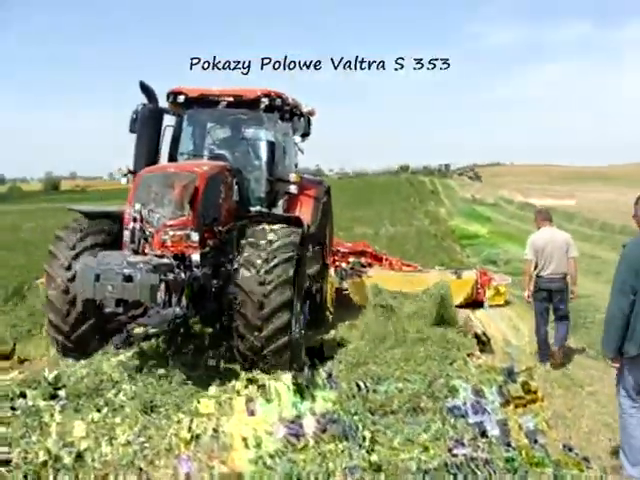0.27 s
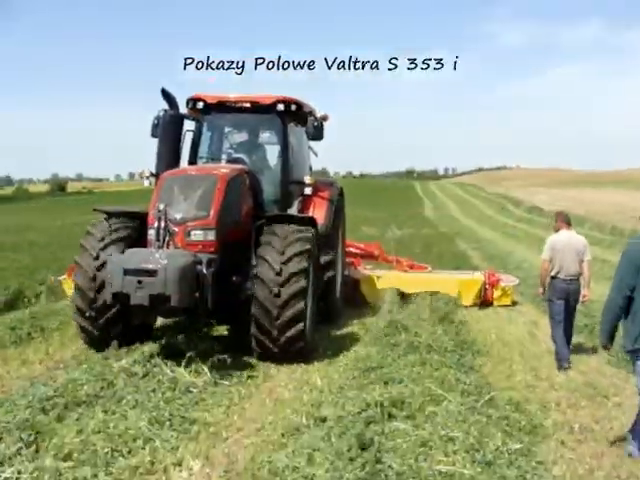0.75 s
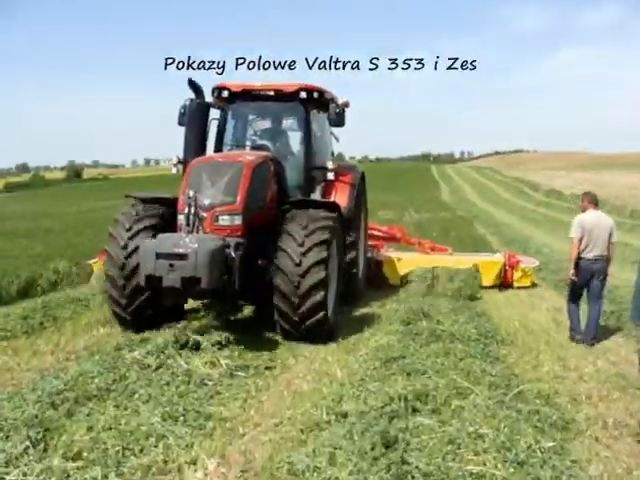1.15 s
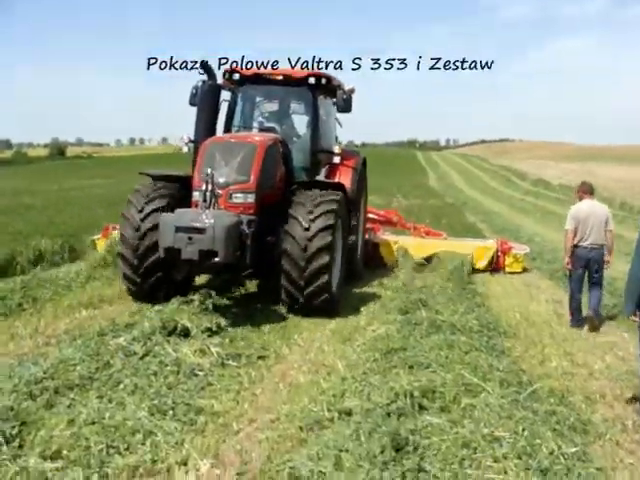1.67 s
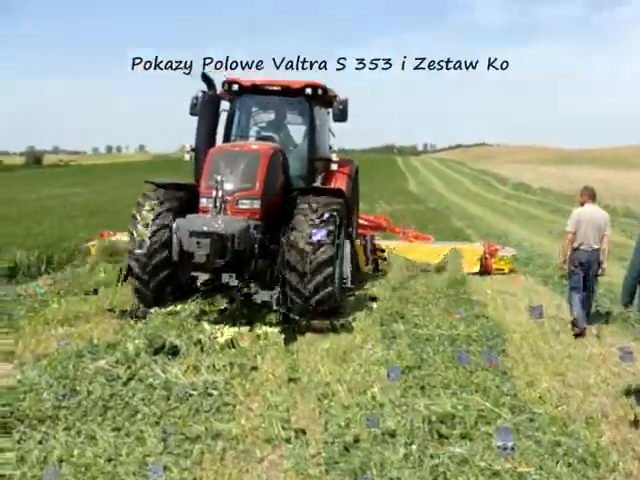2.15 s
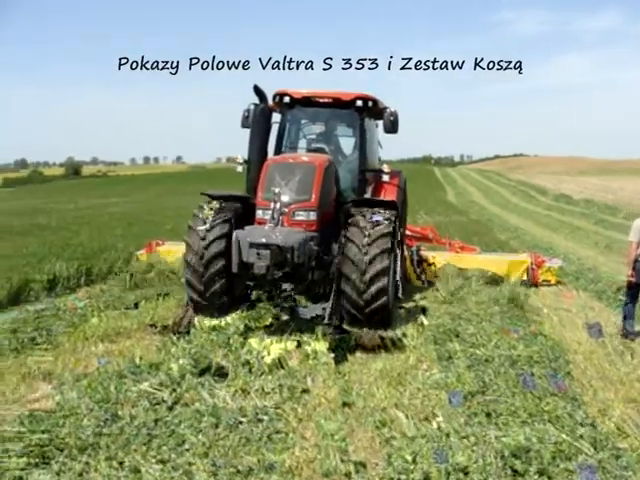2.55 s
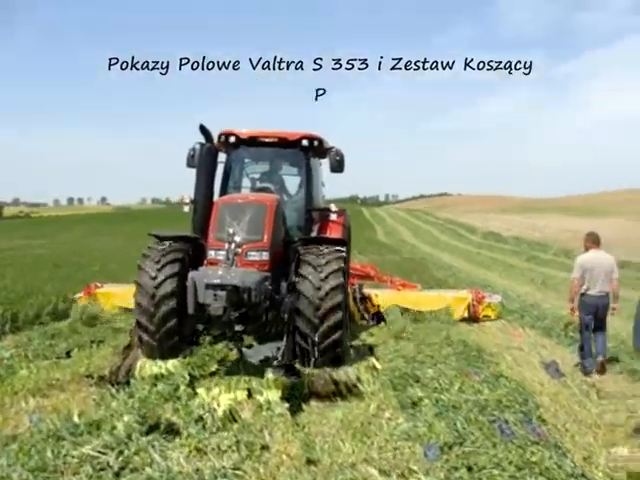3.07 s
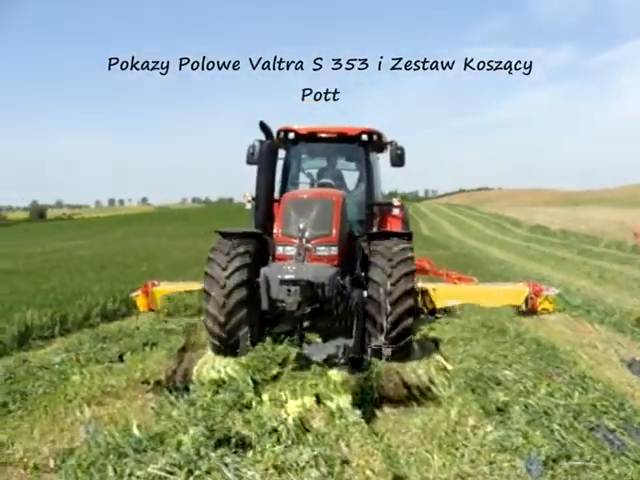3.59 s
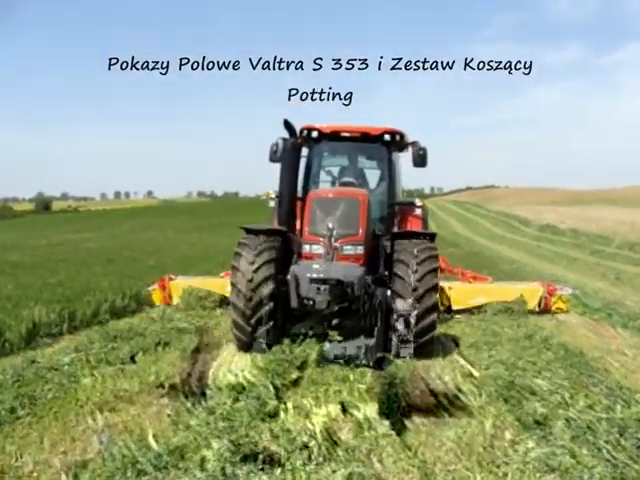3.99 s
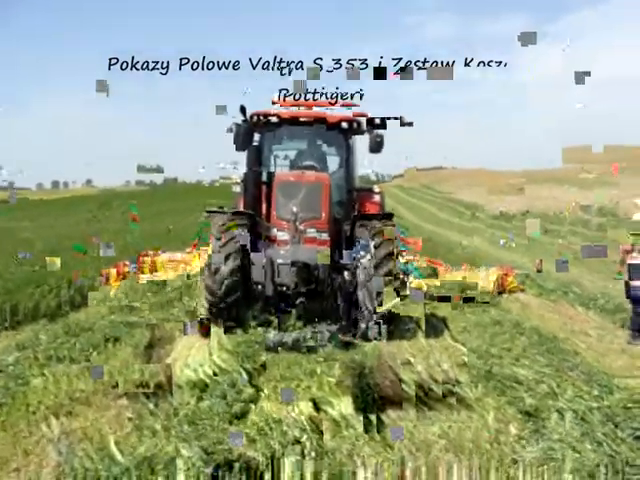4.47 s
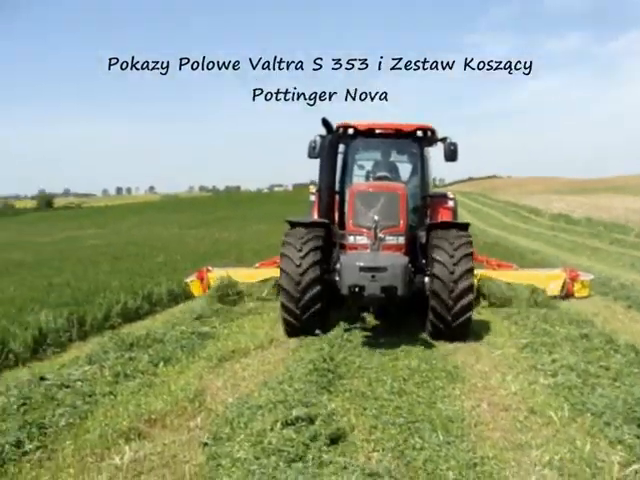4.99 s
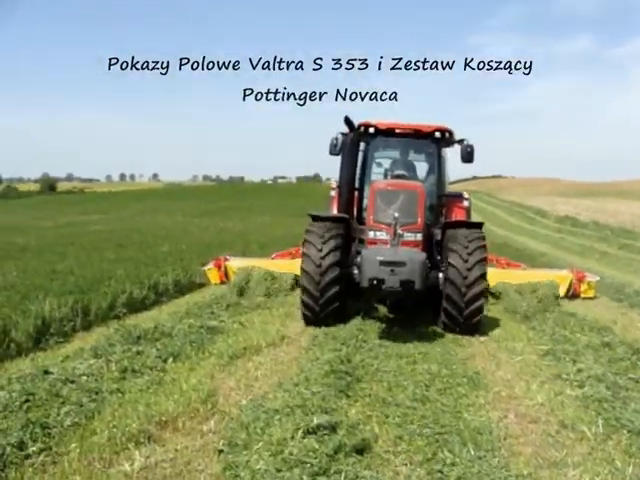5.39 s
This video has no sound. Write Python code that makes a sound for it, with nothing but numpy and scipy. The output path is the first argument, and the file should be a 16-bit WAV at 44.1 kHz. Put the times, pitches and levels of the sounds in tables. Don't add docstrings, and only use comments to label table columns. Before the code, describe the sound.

A large tractor engine drones steadily at high idle outdoors, with a thin wavering turbo whistle and broad hiss from a spinning mower.

```python
import sys
import numpy as np
from scipy import signal
from scipy.io import wavfile
from scipy.ndimage import uniform_filter1d

SR = 44100
rng = np.random.default_rng(int(sys.argv[2]) if len(sys.argv) > 2 else 0)


def digitize_waveform(pressure):
    field = np.atleast_2d(pressure).T
    bounded = np.clip(field, -1, 1)
    quanta = np.round(bounded * 32767).astype(np.int16)
    wavfile.write(sys.argv[1], SR, quanta)


def rack_gain(trim_db):
    fader = np.asarray(trim_db, float)
    return 10 ** (fader / 20)


N = 248283
T = np.arange(N) / SR
AWAY = np.linspace(-.5, .5, N)
START_S = .311

# (time [s], firing rate [Hz])
FIRING_RATE = [(.31, 115.5), (.65, 115.75), (1.2, 114.4), (1.55, 114.1), (2.1, 116.3), (2.35, 116.3),
               (2.75, 114.7), (2.95, 114.65), (3.2, 114.87), (5.3, 114.82), (5.63, 115.1)]


def evened(x):
    return x / np.sqrt(np.mean(abs(x) ** 2) + 1e-20)


def curve(rows):
    s, value = np.transpose(rows)
    return np.interp(T, s, value)


def smooth(rows):
    return uniform_filter1d(curve(rows), size=6000)


def swells(rows, axis=2):
    t = T[::64]
    total = 0
    for row in rows:
        phase = np.clip((t - row[0]) / row[1], -.5, .5)
        total = total + row[axis] * np.cos(np.pi * phase) ** 2
    return np.interp(T, t, total)


def drift(width_hz):
    r = np.exp(-np.pi * width_hz * 8 / SR)
    z = [1, 1j] @ rng.standard_normal((2, (N + SR) // 8 + 1))
    z = signal.lfilter([1], np.convolve([1, -r], [1, -r]), z)
    return evened(np.interp(T + 1, np.arange(len(z)) * 8 / SR, z))


def tone(hz, db, rough, width_hz):
    cycles = np.cumsum(hz * np.ones(N)) / SR + rng.random()
    carrier = np.exp(2j * np.pi * cycles)
    rough = np.clip(rough, 0, 1)
    waver = np.sqrt(1 - rough ** 2) + rough * drift(width_hz)
    return np.sqrt(2) * rack_gain(db) * (carrier * waver).real


def faint(lines, unit_hz):
    far = np.clip(2.5 * AWAY + .5, 0, 1)
    return sum(tone(k * unit_hz, 1.5 + near_db + (far_db - near_db) * far, rough=.35, width_hz=4)
               for k, near_db, far_db in lines)


def facing(pairs, changes):
    # (time [s], turn [0 = side on, 1 = head on])
    nose = [
        (.31, 0),
        (2.1, 0.02),
        (2.83, .17),
        (2.845, .93),
        (3.2, 1),
        (5.63, 1),
    ]
    turn = curve(nose)
    return [side_db + (head_db - side_db) * turn + swells(rows)
            for (side_db, head_db), rows in zip(pairs, changes)]


def read(points, hz):
    f, db = np.transpose(points)
    return np.interp(np.log(hz + 1), np.log(f), db)


def band(lo_hz, hi_hz, count):
    sos = signal.butter(8, [lo_hz, hi_hz], "bandpass", fs=SR, output="sos")
    return evened(signal.sosfilt(sos, rng.standard_normal(count + 500))[500:])


def exhaust():
    # (side on [dB], head on [dB])
    orders = [(-33.5, -30.5), (-40, -39.5), (-31, -27.5), (-44.5, -27.5), (-19.5, -30), (-38, -43)]
    # (middle [s], length [s], change [dB])
    echo = [
        [(1.3, 0.97, 4.5), (1.82, 0.79, -9), (4.15, 0.24, -7)],
        [(1.87, .4, -9), (2.9, 3, 5), (3.85, 0.44, 5.5)],
        [(1.15, 1, -3.5), (2.22, 0.45, 4), (2.9, 0.49, -2), (4.6, 0.47, -4), (5.6, 0.91, -14)],
        [(1.35, .6, 12), (2.05, 0.54, 13), (3.62, 0.19, -4), (4.2, 0.23, -4), (2.65, .3, 10), (2.95, 0.31, -10)],
        [(.85, 0.29, -4), (2.18, 0.27, -4), (2.7, 0.23, -5), (4, 0.43, 4), (3.6, .2, -13), (4.45, 0.3, 6.5),
         (4.93, 0.24, -15), (5.5, 0.69, -9)],
        [(2.2, .5, 7.5), (2.6, 0.59, 10), (3.5, .3, 10)],
    ]
    # (multiple of crank speed [-], near [dB], far [dB])
    crank = [(20, -52, -45), (24, -49, -45), (26, -50, -45), (27, -47, -46), (30, -40, -48), (32, -42, -45),
             (33, -45, -46), (36, -47, -52), (42, -40, -39), (52, -43, -40)]
    # (multiple of crank speed [-], resting level [dB])
    mesh_lines = [(28, -60), (30, -60), (42, -60), (52, -60)]
    # (middle [s], length [s], change [dB])
    mesh_swells = [
        (1.7, 1.2, 24),
        (1.25, 1.2, 24),
        (2.7, 2, 26),
        (3, 2.2, 26),
    ]
    hz = smooth(FIRING_RATE)
    strong = sum(tone(k * hz, db, rough=.15, width_hz=18)
                 for k, db in enumerate(facing(orders, echo), 2))
    mesh = sum(tone(k * hz / 3, db + swells([bump]), rough=.4, width_hz=8)
               for (k, db), bump in zip(mesh_lines, mesh_swells))
    return strong + faint(crank, hz / 3) + mesh


def shafts():
    # (side on [dB], head on [dB])
    hums = [
        (-47.5, -43),
        (-40, -40.5),
        (-39.5, -37),
    ]
    # (middle [s], length [s], change [dB])
    beats = [
        [(.8, .4, 5.5), (2.95, .5, -9)],
        [(.85, .35, -12), (1.72, .25, -9), (3.72, 0.18, -12), (4.12, .2, -9), (4.65, .8, -13)],
        [(.65, 0.83, 4), (1.85, .7, -11), (3, .3, -10)],
    ]
    # (multiple of disc speed [-], near [dB], far [dB])
    discs = [(1, -56, -58), (3, -53, -54), (8, -52, -46), (10, -43, -48), (12, -48, -43), (14, -50, -45),
             (16, -47, -47), (19, -52, -47), (20, -41, -50)]
    # (frequency [Hz], near [dB], far [dB])
    gears = [(175, -50, -49), (623, -40, -42), (5362, -46, -46)]
    disc_hz, fan_hz = 53.37, 58.6
    speed = smooth(FIRING_RATE)
    speed = speed / speed.mean()
    hum_hz = (2 * disc_hz, 2 * fan_hz, 4 * disc_hz)
    hum = sum(tone(hz * speed, db, rough=.2, width_hz=6)
              for hz, db in zip(hum_hz, facing(hums, beats)))
    return hum + faint(discs, disc_hz * speed) + faint(gears, speed)


def turbo():
    # (time [s], blade tone [Hz])
    blade_tone = [(.31, 9260), (.5, 9260), (.9, 8960), (1.12, 8870), (1.4, 8990), (1.75, 9380), (2.0, 9490),
                  (2.15, 9310), (2.5, 8550), (2.7, 8315), (2.9, 8330), (3.3, 8660), (3.6, 8890),
                  (4.1, 9165), (4.7, 9465), (5.3, 9725), (5.63, 9815)]
    # (middle [s], length [s], change [dB])
    flares = [(.45, 0.68, 7.5), (.99, 0.31, 5.5), (1.28, 0.38, 4.5), (1.77, 0.2, 8.5), (2.05, 0.13, 7),
              (2.17, .12, -6), (2.36, 0.13, 3), (2.47, 0.1, -1), (3.27, .15, 5), (3.5, 0.13, 2),
              (3.71, .12, -6), (3.82, 0.11, 9), (4, 0.21, 7.5), (4.4, .4, -7), (4.72, 0.44, 6),
              (5.32, .2, 2)]
    # (middle [s], length [s], change [Hz], change [dB])
    skirt_lean = [
        (1.1, .8, -300, 2.5),
        (4, .5, 200.5, 0.5),
    ]
    hz = smooth(blade_tone)
    resonance_db = 7.5 * np.exp(-((hz - 8920) / 230) ** 2)
    fading_db = 2.2 * drift(20).real
    db = -41.5 + resonance_db + swells(flares) + fading_db
    whistle = tone(hz, np.maximum(db, -44.5) + .6, rough=.64, width_hz=110)
    duct_db = -5 * np.clip((hz - 8950) / 400, -1.3, 1.3) ** 2
    skirt_db = uniform_filter1d(db, size=4000) - 2.5 + duct_db + swells(skirt_lean, axis=3)
    skirt_hz = hz + 45 + swells(skirt_lean)
    return whistle + tone(skirt_hz, skirt_db, rough=.99, width_hz=460)


def roar():
    # (frequency [Hz], density [dB
    # per Hz])
    roar_spectrum = [(30, -76), (65, -73), (95, -67), (150, -65), (250, -54), (330, -53.5), (420, -59.5),
                     (530, -52), (640, -50), (780, -52.5), (950, -58), (1180, -52.5), (1440, -54.5),
                     (1600, -49), (1980, -50), (2080, -53), (2450, -50.5), (2900, -52), (4050, -53), (4650, -57.5),
            (5300, -55.5), (6400, -59.5), (7250, -66), (8300, -68.5), (9200, -70), (10100, -75.5)]
    # (frequency [Hz], change [dB])
    retreat = [(200, -2.5), (410, 4), (620, -0.5), (950, 0.5), (1170, -3), (1500, -0.3), (2500, 2),
               (4000, 1), (9000, -0.5)]
    # (time [s], level [dB])
    roar_level = [
        (.31, -20.5),
        (.36, -17),
        (1.33, -18),
        (1.8, -18),
        (3.1, -16.5),
        (4.45, -16.5),
        (5.63, -16),
    ]
    frames, hz = N // 256 + 5, np.fft.rfftfreq(1024, 1 / SR)
    a, b, patches = rng.standard_normal((frames, 513, 3)).T
    patches = uniform_filter1d(patches, size=8, axis=0)
    patches = evened(uniform_filter1d(patches, size=8, axis=1))
    cells = rng.random((513 // 9, frames // 4 + 1)) < .03
    gaps = np.kron(cells, np.ones((9, 4)))[:, :frames] * (hz[:, None] > 4500)
    patches = patches - 13 * gaps
    distance = np.linspace(-.5, .5, frames)
    colour_db = read(roar_spectrum, hz)[:, None] + np.outer(read(retreat, hz), distance)
    spectrum = (a + 1j * b) * rack_gain(colour_db + .8 * patches)
    x = signal.istft(spectrum, nperseg=1024, noverlap=768)[1][:N]
    sos = signal.butter(4, [1400, 7000], "bandpass", fs=SR, output="sos")
    mids = signal.sosfilt(sos, x)
    level_db = curve(roar_level) + 0.57 * drift(60).real
    return x / np.sqrt(uniform_filter1d(mids ** 2, size=SR // 2)) * rack_gain(level_db)


def cowl():
    # (middle [s], length [s], change [dB], change [Hz])
    cavity = [
        (1.5, .7, 2, 90),
        (2.55, 1.1, 8.5, -95),
        (3.3, 1.1, 6, 200),
        (4.2, .6, -2, 28.5),
        (4.7, 0.49, 5, 91),
    ]
    return tone(1711 + swells(cavity, axis=3), -37 + swells(cavity), rough=0.95, width_hz=220)


def start_spit(after):
    spit = rack_gain(-29.5) * band(7200, 8500, count=N) + rack_gain(-50.5) * band(9900, 10900, count=N)
    return spit * np.clip((.04 - after) / 0.0091, 0, 1)


def channel_splits():
    # (time [s], low edge [Hz], high edge [Hz], level [dB])
    splits = [(1.141, 5170, 6340, -31), (1.211, 5700, 7000, -34), (1.582, 4650, 5700, -29),
              (1.768, 4000, 5030, -33), (1.931, 7600, 9700, -36), (2.998, 5130, 6400, -29),
              (2.999, 7600, 9200, -41), (3.975, 5600, 6940, -31)]
    sides = np.zeros((2, N))
    for s, lo_hz, hi_hz, db in splits:
        at = round(s * SR) - 1024
        burst = rack_gain(db) * band(lo_hz, hi_hz, count=2048) * np.hanning(2048)
        sides[:, at:at + 2048] += np.outer([1, -1], burst)
    return sides


def scene():
    return np.tile(exhaust() + shafts() + turbo() + roar() + cowl(), (2, 1))


def band_limit(x):
    return signal.sosfilt(signal.butter(12, 10900, fs=SR, output="sos"), x)


def record(dry):
    edge = signal.firwin(1023, 10045, window=("kaiser", 11), fs=SR)
    limited = np.tanh(dry / 0.93) * 0.97
    wet = signal.oaconvolve(limited, edge[None], "same")
    after = T - START_S
    wet = (wet + start_spit(after)) * (after > 0)
    return band_limit(wet + channel_splits())


dry = scene()
out = record(dry)
digitize_waveform(out)
```